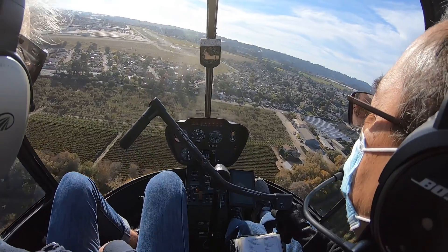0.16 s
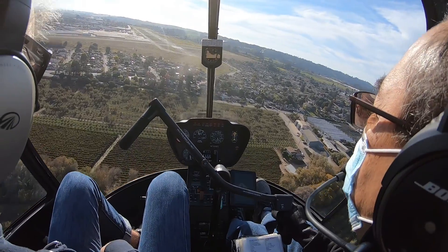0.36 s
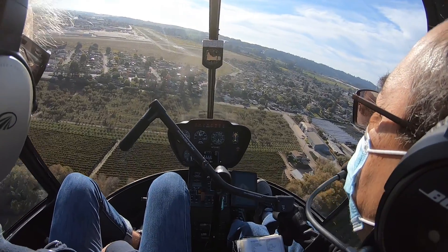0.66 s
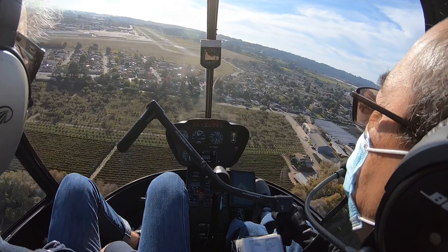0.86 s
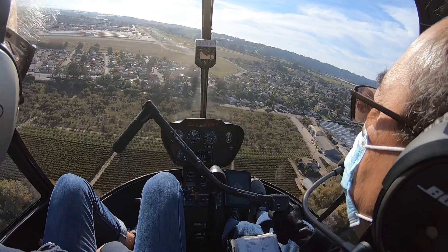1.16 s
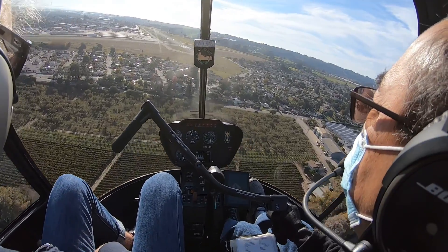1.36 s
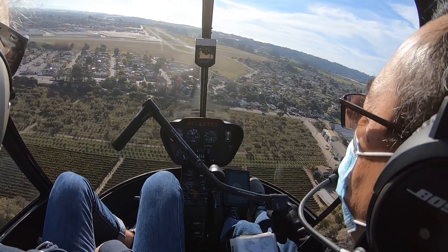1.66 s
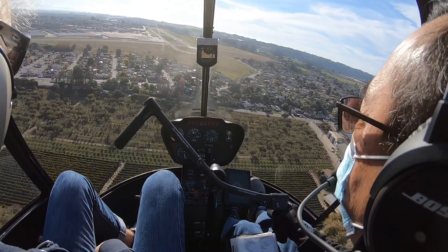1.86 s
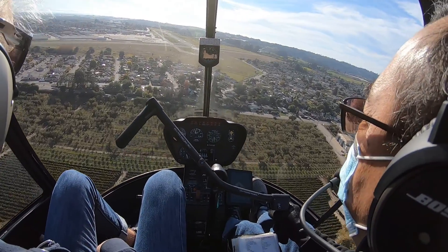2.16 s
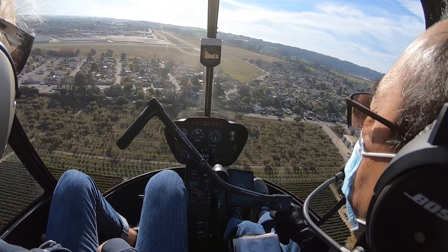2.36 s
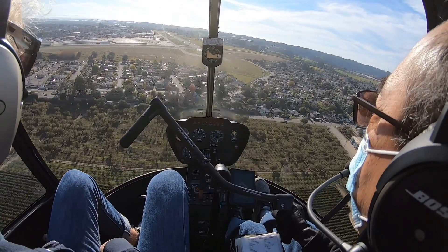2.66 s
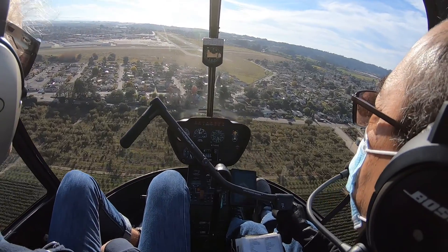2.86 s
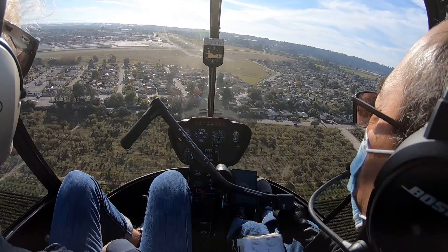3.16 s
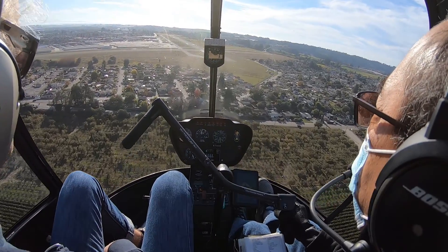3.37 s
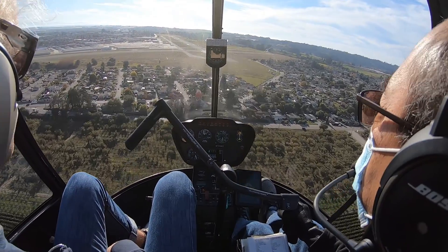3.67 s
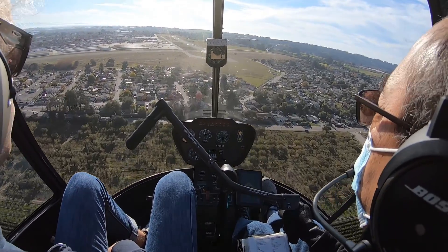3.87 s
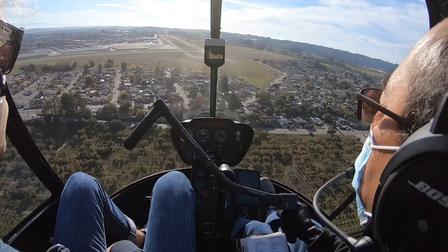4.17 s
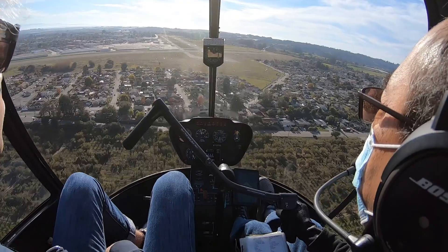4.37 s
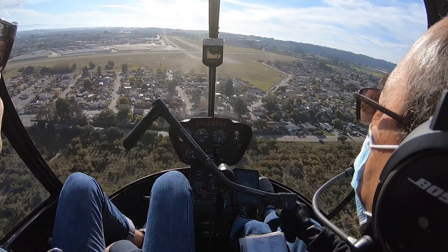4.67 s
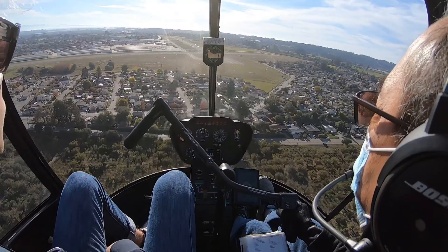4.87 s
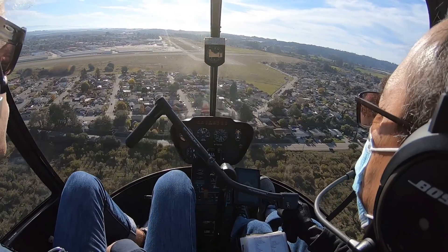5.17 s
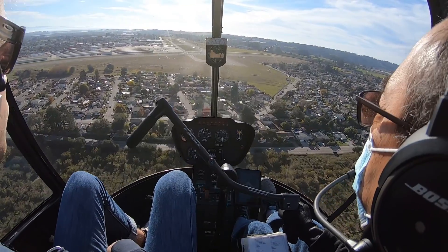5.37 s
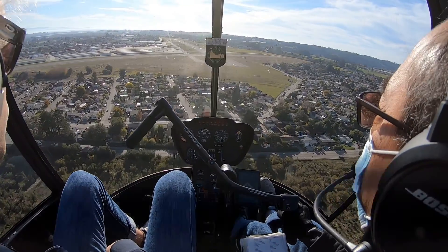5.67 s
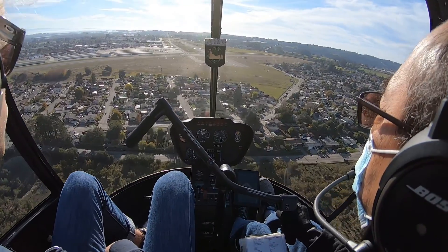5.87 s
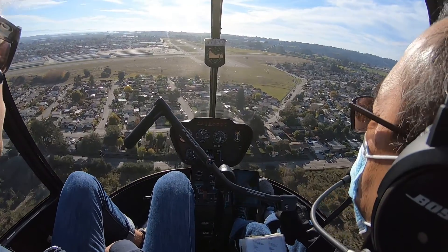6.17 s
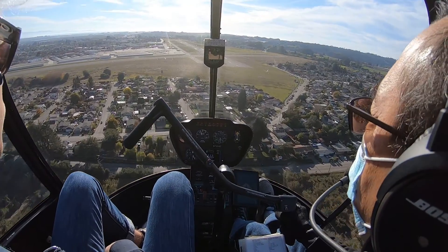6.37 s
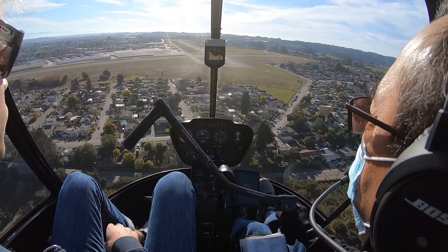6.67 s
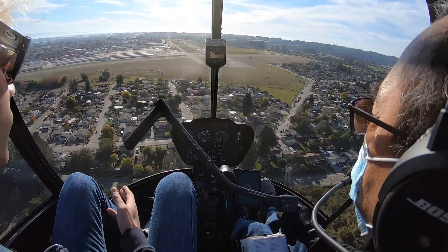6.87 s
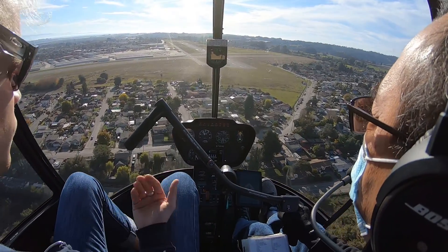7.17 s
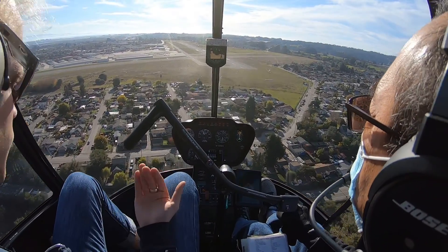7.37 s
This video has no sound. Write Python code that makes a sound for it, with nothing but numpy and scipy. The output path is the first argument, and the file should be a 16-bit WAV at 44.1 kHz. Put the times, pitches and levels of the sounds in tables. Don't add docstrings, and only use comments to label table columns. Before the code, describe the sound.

Inside a small helicopter cabin in flight, a two-blade rotor slaps hard about seventeen to eighteen times a second, each crack followed by quick cabin echoes and a scattered noisy burst. Wind roar, blade swish and engine and tail rotor hum fill the gaps. Around one second the slaps soften while wind rises, then they return. Close headset microphone, gritty and overloaded, left only; right has faint hiss.

```python
import sys
import numpy as np
from scipy import signal
from scipy.fft import rfft, irfft, next_fast_len
from scipy.io import wavfile
from scipy.ndimage import map_coordinates

SR = 44100
rng = np.random.default_rng(int(sys.argv[2]) if len(sys.argv) > 2 else 0)


def master_out(mix):
    frames = np.transpose(np.atleast_2d(mix))
    ceiling = np.clip(frames, -1, 1)
    pcm = np.round(ceiling * 32767).astype(np.int16)
    wavfile.write(sys.argv[1], SR, pcm)


def elevation(decibels):
    levels = np.asarray(decibels, float)
    return 10 ** (levels / 20)


N = 331746


def unit(x):
    return x / np.sqrt(np.mean(x ** 2) + 1e-20)


def curves(rows):
    s, *columns = np.transpose(rows)
    return [np.interp(np.arange(N) / SR, s, column) for column in columns]


def wobble(rate):
    knots = rng.standard_normal(int(N * rate / SR) + 4)
    return map_coordinates(knots, [np.arange(N) * rate / SR])


def filtered(x, response):
    m = next_fast_len(N + 8192)
    hz = np.fft.rfftfreq(m, 1 / SR)
    return irfft(rfft(x, m) * response(hz), m)[:N]


def noise(spectrum):
    f, db = np.transpose(spectrum)
    colour = lambda hz: elevation(np.interp(np.log(hz + 1), np.log(f), db))
    return unit(filtered(rng.standard_normal(N), colour))


def late(hz, ms):
    return np.exp(-2j * np.pi * hz * ms / 1000)


def train(times, gains):
    places = np.round(times * SR).astype(int)
    return np.bincount(np.clip(places, 0, N - 1), gains, N)


def after_each(times, gains, shape, lead_ms):
    ms = np.arange(SR // 16) * 1000 / SR - lead_ms
    lead = int(lead_ms * SR / 1000)
    laid = signal.fftconvolve(train(times, gains), shape(ms))
    return np.abs(laid[lead:lead + N])


def hum(base_hz, orders):
    turn = 2 * np.pi * base_hz * np.arange(N) / SR
    out = np.zeros(N)
    for order, db in orders:
        out += elevation(db + 2.5 * wobble(9)) * np.sin(order * turn + .6 * wobble(8))
    return out


def idle_input():
    # f/Hz, level/dB per Hz
    hiss = [(10, 0), (100, -11), (400, -18), (2000, -23), (10000, -28), (15000, -29), (15800, -50)]
    return elevation(-71 + 1.2 * wobble(1.5)) * noise(hiss)


def crankshaft():
    # multiple of the crank rate, peak level/dB
    orders = [(4, -62), (6, -50.5), (8, -67)]
    return hum(44.0, orders)


def tail_rotor():
    # multiple of the blade rate, peak level/dB
    orders = [(2, -53), (3, -47), (4, -52)]
    return hum(112.4, orders)


def air(pass_s):
    # t/s, level/dB
    turbulence = [(0.02, -32), (0.3, -31), (0.9, -32), (1.15, -30.5), (1.38, -25.5), (1.61, -26.5),
                  (1.84, -27.5), (2.07, -27), (2.3, -27), (2.75, -32.5), (3.21, -30.5), (3.9, -29.5),
                  (4.57, -30), (5.3, -29.5), (5.94, -30), (6.4, -28.5), (6.85, -29.5), (7.31, -27)]
    # f/Hz, level/dB per Hz
    roar_colour = [(25, -19), (100, -49), (170, -18.5), (330, -7.5), (420, -10), (650, -3), (750, -4.5),
                   (1220, -4), (1860, -1.5), (3040, -6), (4120, -11.5), (7230, -29), (11800, -49.5),
                   (16000, -66)]
    # f/Hz, level/dB per Hz
    swish_colour = [(800, -40), (2000, -12), (3500, -4), (5000, -8), (7300, -12), (8500, -22), (12000, -27),
                    (16000, -45)]
    roar_db, = curves(turbulence)
    swish_db = -32.5 + 1.23 * (roar_db + 30)
    sweep = lambda ms: np.exp(-.5 * ((ms - 6) / np.where(ms < 6, 7, 10.5)) ** 2)
    strength = elevation(rng.normal(0, 0.85, len(pass_s)))
    swish = unit(after_each(pass_s, strength, sweep, 25)) * noise(swish_colour)
    roar = elevation(roar_db + 2.5 + 0.4 * wobble(6.9) + 0.56 * wobble(40)) * noise(roar_colour)
    return roar + elevation(swish_db - 2.5) * swish


def cabin(hz):
    # f/Hz, width/Hz, depth (0-1)
    nulls = [(192, 20, .4), (382, 45, .55), (490, 40, .45), (655, 40, .65)]
    left = [1 - depth * 1j * hz * w / (c * c - hz * hz + 1j * hz * w) for c, w, depth in nulls]
    return np.prod(left, axis=0)


def passes():
    # t/s, speed/rpm
    rotor = [(0, 530.24), (.6, 526.19), (.95, 526.85), (1.2, 524.29), (2.6, 525.11), (3.2, 528.43),
             (4.3, 528.04), (4.8, 526.51), (6.6, 526.28), (7.1, 523.46), (7.52, 524.33)]
    # t/s, vortex closeness/dB, how far the second blade tracks off it/dB, blade loading/dB
    wake = [(0, -.5, .5, 0), (.2, 1, 3, 0), (.53, 1.7, 3.7, 0), (.6, 0, -.5, 0), (1.08, -2, 1, 0),
            (1.17, -22, 0, -1), (1.52, -20, -1, 0), (1.6, -1, -1.3, 1), (2.26, -1.2, -1.4, 0),
            (2.4, 1.6, -.6, 0), (2.9, 1.9, .3, 0), (3.4, 1.7, 3.2, 0), (4.0, 1.9, 4, 0), (4.3, 1.6, 1.5, 1),
            (5.3, 1.6, 2.2, 1), (6.4, 1.8, 3.4, 1), (7.0, .6, 1, 0), (7.52, 1, 2, 0)]
    # t/s, crack change/dB, cabin answer change/dB
    gusts = [(.356, -1, -2.5), (1.040, -3.5, 0), (1.612, -2.8, 2), (1.784, -.7, -3), (1.899, -.7, -2.5),
             (2.412, .8, 3), (2.927, .9, 0), (3.268, 1.2, 2.5), (3.722, 1.2, 2), (3.778, -2.5, -2),
             (3.836, .7, 0), (4.346, -1, 2), (4.404, .9, 0), (4.517, -3.3, -3), (4.573, -3.5, -2.5),
             (4.745, 1.3, 0), (5.029, -.5, 2), (5.201, -2, -3), (5.485, -5.7, -2.5), (5.599, -5.5, -3.5),
             (5.657, .9, 1.5), (5.713, -5.3, -2.5), (5.771, 1.2, 2.5), (5.999, -1.6, 0), (6.113, 1.3, 1),
             (6.169, -4.5, -3), (6.283, .5, -3.5), (6.683, -2, .5), (6.911, 1.6, 0), (7.197, -5.5, -2)]
    t = np.arange(N) / SR
    turns = .35 + np.cumsum(curves(rotor)[0]) / 60 / SR
    whole = np.arange(int(turns[-1]))
    s = np.interp(np.ravel([whole + .4937, whole + 1], order="F"), turns, t)
    second = 1 - np.arange(len(s)) % 2
    close_db, off_db, load_db = (np.interp(s, t, c) for c in curves(wake))
    gust_s, *gust = np.transpose(gusts)
    nearest = np.abs(s[:, None] - gust_s).argmin(axis=0)
    near_db, answer_db = (np.bincount(nearest, g, len(s)) for g in gust)
    chance = rng.standard_normal((len(s), 4))
    crack_db = close_db - second * off_db + near_db + .3 * chance[:, 0] * (near_db == 0)
    far_db = np.minimum(close_db, 0)
    wide_db = second * (-0.5 - 0.78 * (off_db - np.minimum(near_db, 0)))
    thud_db = -7.5 + 0.65 * far_db + wide_db + .9 * chance[:, 1]
    cabin_db = -14.5 + load_db + 0.031 * far_db + answer_db + .8 * chance[:, 2]
    wander_ms = .08
    return s + wander_ms / 1000 * chance[:, 3], thud_db, cabin_db, crack_db


def pulse(hz, centre_hz, width_hz, blunt_ms, suction, early_ms):
    spike = np.exp(-.5 * (2 * np.pi * hz * blunt_ms / 1000) ** 2) * (1 - suction * late(hz, -.175))
    ring = 1j * hz * SR / (2 * np.pi) / (centre_hz ** 2 - hz ** 2 + 1j * hz * width_hz)
    microphone = (1j * hz / (300 + 1j * hz)) ** 2
    return spike * ring * late(hz, -early_ms) * microphone


def sounded(impulses):
    # f/Hz, width/Hz, lift/dB
    thud_rings = [(885, 1100, 18.5), (870, 500, 14.3)]
    # f/Hz, width/Hz
    crack_rings = [(1980, 800), (1600, 1200)]
    out = np.zeros(N)
    for (thuds, cracks), (centre_hz, width_hz, lift_db), crack in zip(impulses, thud_rings, crack_rings):
        out += elevation(lift_db) * filtered(thuds, lambda hz: pulse(hz, centre_hz, width_hz, .14, .67, .1))
        out += filtered(cracks, lambda hz: pulse(hz, *crack, .048, .59, .027))
    return out


def blows(s, paths, thud_db, crack_db, scatter_db=0, scatter_ms=0):
    ms, ratio = np.transpose(paths)
    chance = rng.standard_normal((len(s), len(ms), 2))
    arrive = s[:, None] + (ms + scatter_ms * chance[..., 0]) / 1000
    size = ratio * elevation(scatter_db * chance[..., 1])

    def hits(blade, db):
        gains = size * elevation(db[:, None])
        return train(arrive[blade::2].ravel(), gains[blade::2].ravel())

    return np.array([[hits(blade, thud_db), hits(blade, crack_db)] for blade in (0, 1)])


def bounced(cabin_db, crack_db):
    return cabin_db + np.minimum(crack_db + 7, 0)


def far_slaps(s, thud_db, cabin_db, crack_db):
    # delay/ms, pressure ratio
    neighbour = [(1.0, .2), (2.05, .4), (5.0, .2), (6.44, .2), (7.62, .2), (8.7, .15), (9.43, .25),
                 (10.18, .17), (11.4, .2)]
    bounce_db = bounced(cabin_db, crack_db)
    return sounded(blows(s, neighbour, thud_db + 1.5, bounce_db + 6, 2.1, .04))


def other_headset(rotor, crank):
    # f/Hz, level/dB per Hz
    drone = [(60, -53), (120, -28), (220, -2), (300, -4.5), (350, 6), (420, -1), (560, -2.5), (1000, -7.5),
             (3200, -8), (4500, -10), (5000, -25), (9000, -51)]
    # t/s, gain/dB
    gate = [
        (0, -0.5),
        (.5, 0),
        (1.0, 0),
        (1.4, 2),
        (1.6, 3.5),
        (1.625, -52),
        (7.52, -54),
    ]
    flutter = elevation(wobble(12))
    heard = far_slaps(*rotor) + elevation(-28) * flutter * noise(drone) + elevation(9) * crank
    return elevation(curves(gate)[0]) * heard


def scattered(s, cabin_db):
    # f/Hz, level/dB per Hz
    bright_colour = [(800, -21), (1500, -9.5), (2300, 1), (3000, 2.5), (4000, -8.5), (7000, -24.5),
                     (12000, -54), (16000, -62)]
    # f/Hz, level/dB per Hz
    dull_colour = [(300, -29), (700, -7.5), (1400, 1.5), (2000, 1.5), (3000, -15), (6000, -61)]
    swell = lambda ms: (ms / 8) ** 1.25 * np.exp(1.41 * (1 - (ms / 8) ** 1.36)) + 0.27 * np.exp(-ms / 16)
    linger = lambda ms: swell(ms) + 0.32 * (ms / 14) ** 2 * np.exp(2 * (1 - ms / 14)) * (ms > 0)
    tilt_db = rng.normal(0, 2.6, len(s))
    bright = after_each(s, elevation(cabin_db - 7.5 + tilt_db), swell, 0) * noise(bright_colour)
    dull = after_each(s, elevation(cabin_db - 9.5 - tilt_db), linger, 0) * noise(dull_colour)
    return bright + dull


def slaps(s, thud_db, cabin_db, crack_db):
    # delay/ms, pressure ratio
    echo_paths = [(2.22, .24), (2.74, .12), (4.2, .13), (4.88, .2), (5.37, .35), (6.44, .3), (6.96, .1),
                  (7.64, .3), (8.1, .46), (8.55, .32), (8.98, .18), (9.41, .23), (10.1, .08), (10.68, .29),
                  (11.45, .22), (12.5, .08)]
    # delay/ms, pressure ratio
    rear_path = [(11.7, .26)]
    steep_db = 1.7 * np.maximum(crack_db - 1.3, 0)
    direct = blows(s, [(0, 1)], thud_db, crack_db - .6 + steep_db)
    bounce_db = bounced(cabin_db, crack_db)
    echoes = blows(s, echo_paths, thud_db - 11, bounce_db + 13.5, 2.4, .035)
    rear = blows(s, rear_path, thud_db, crack_db - 30, 2.5, .1)
    return sounded(direct + echoes + rear) + scattered(s, cabin_db)


def scene():
    rotor = passes()
    crank = crankshaft()
    in_cabin = filtered(slaps(*rotor) + air(rotor[0]), cabin)
    line = in_cabin + crank + tail_rotor() + other_headset(rotor, crank)
    return np.array([line, idle_input()])


def band_limit(x):
    return signal.sosfilt(signal.butter(12, 16510, fs=SR, output="sos"), x)


def record(dry):
    clipped = np.clip(dry, -.93, .93)
    lost = np.maximum(dry - clipped, 0) ** 1.5
    thump = np.array([filtered(side, lambda hz: 1 / (1 + 1j * hz / 160)) for side in lost])
    strained = clipped - elevation(3.0) * thump
    limited = np.array([filtered(side, lambda hz: hz < 15900) for side in strained])
    return band_limit(limited)


dry = scene()
out = record(dry)
master_out(out)
```